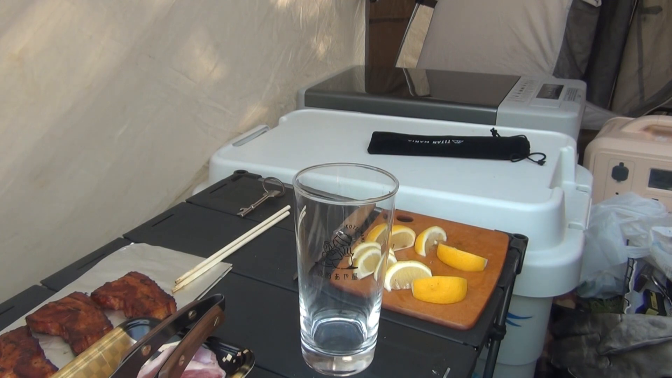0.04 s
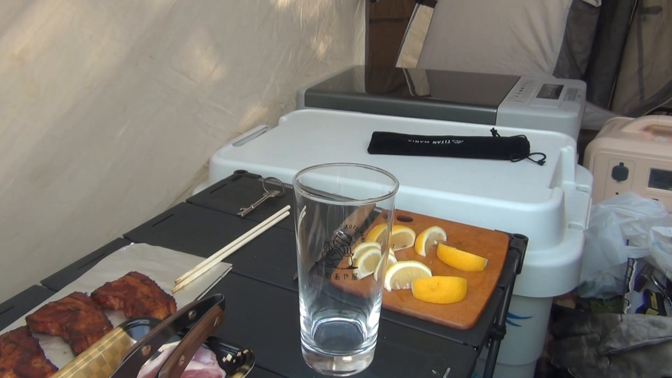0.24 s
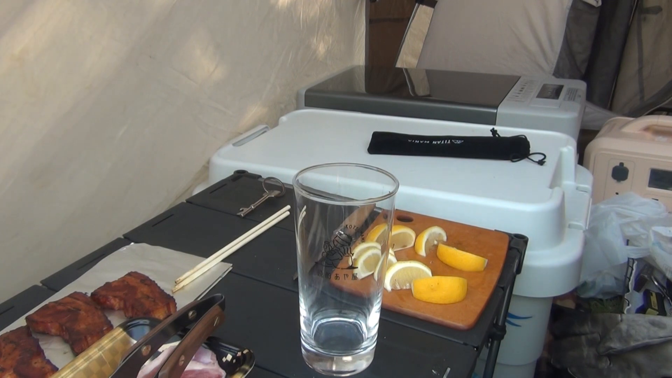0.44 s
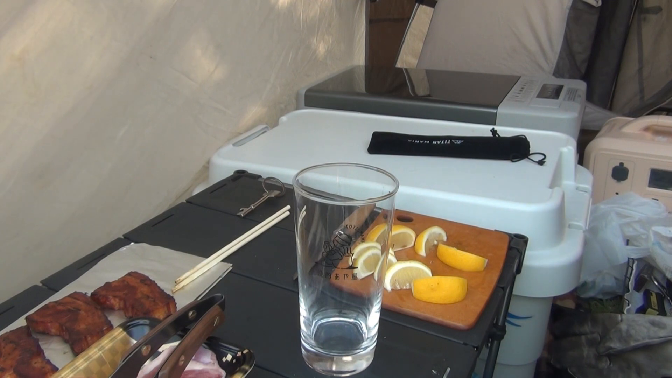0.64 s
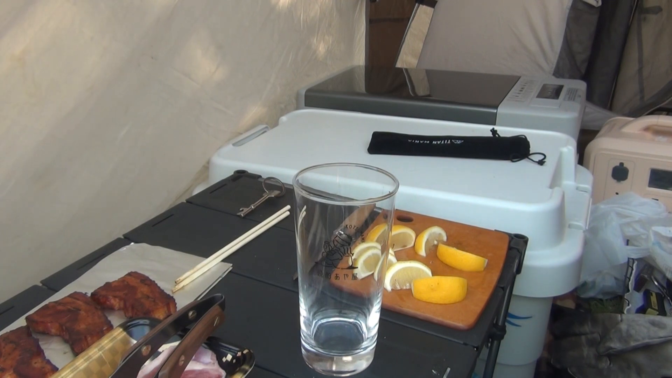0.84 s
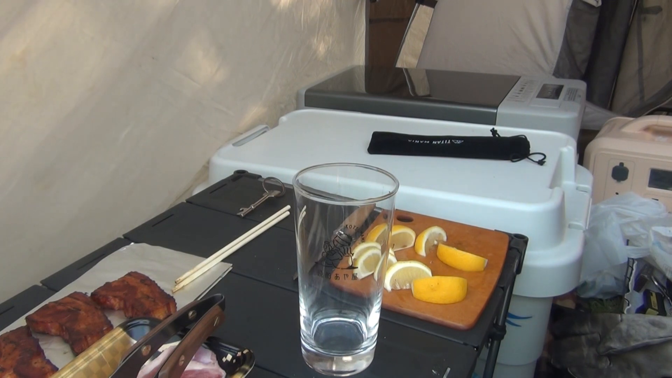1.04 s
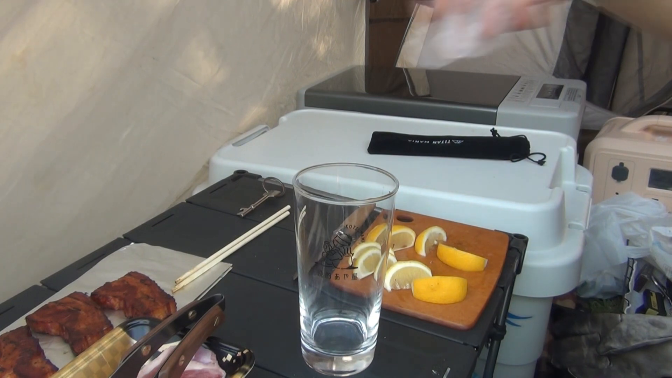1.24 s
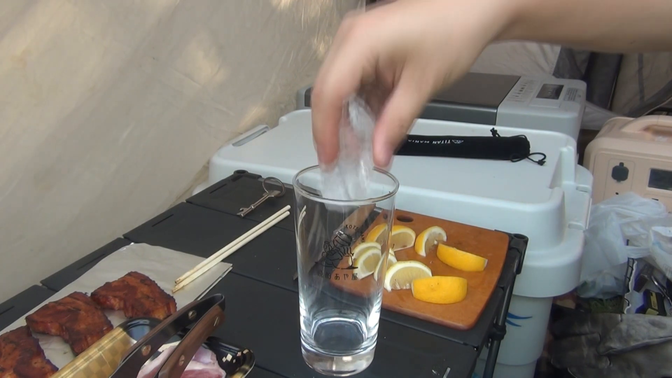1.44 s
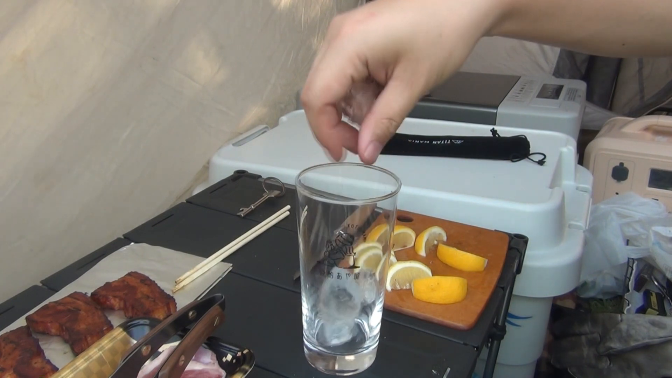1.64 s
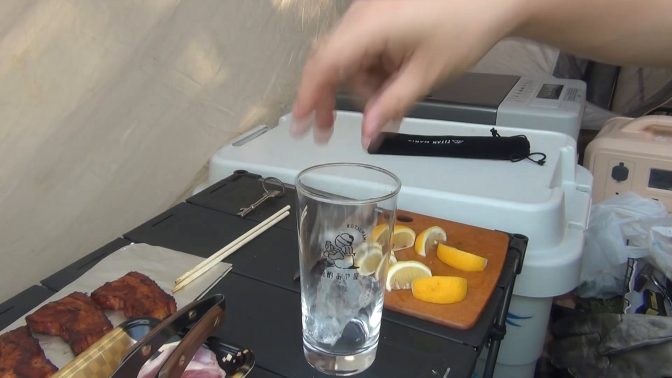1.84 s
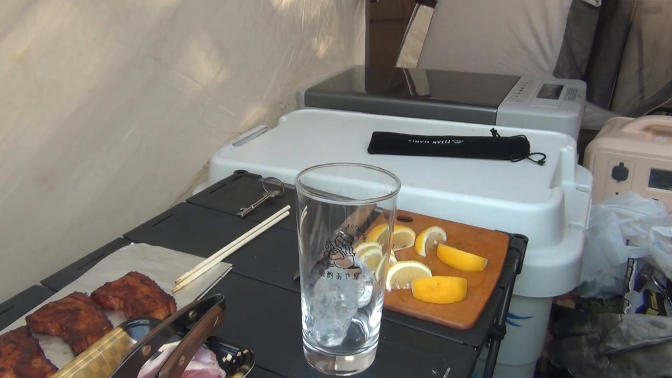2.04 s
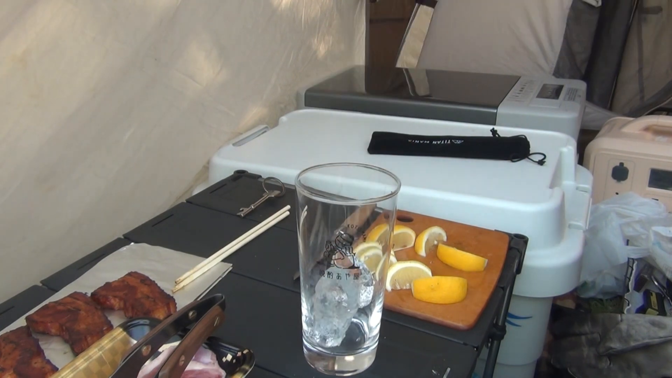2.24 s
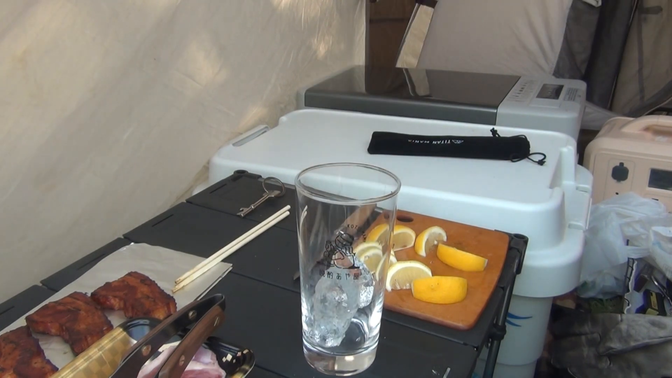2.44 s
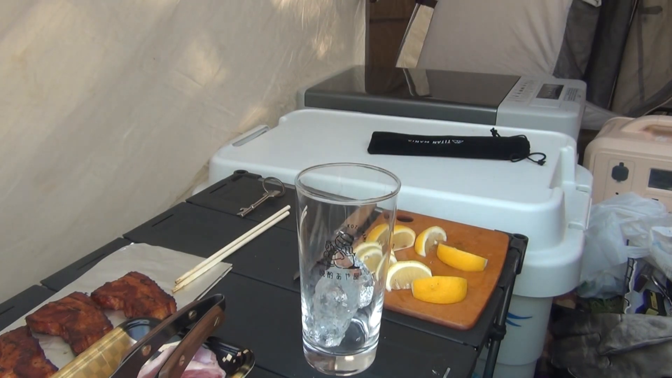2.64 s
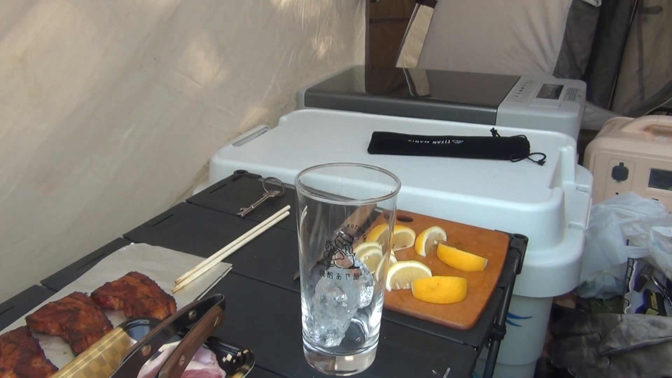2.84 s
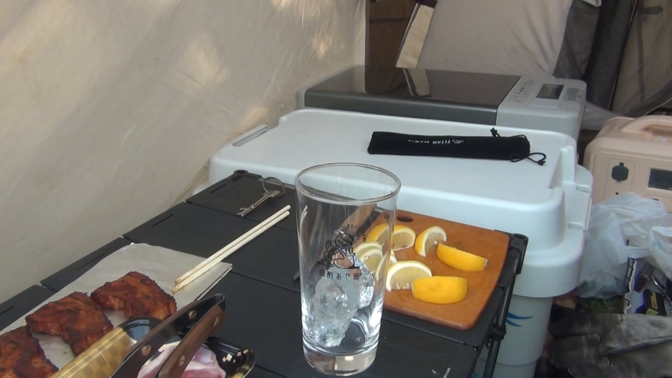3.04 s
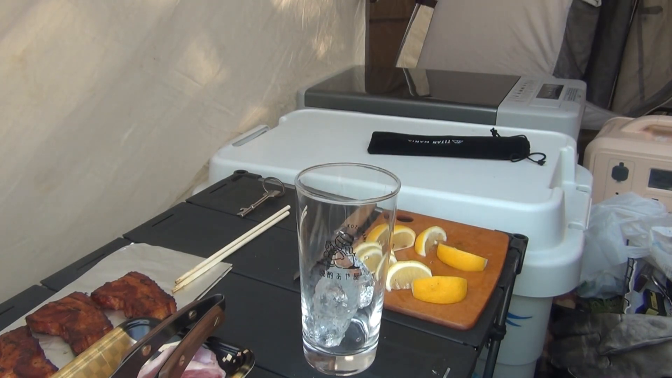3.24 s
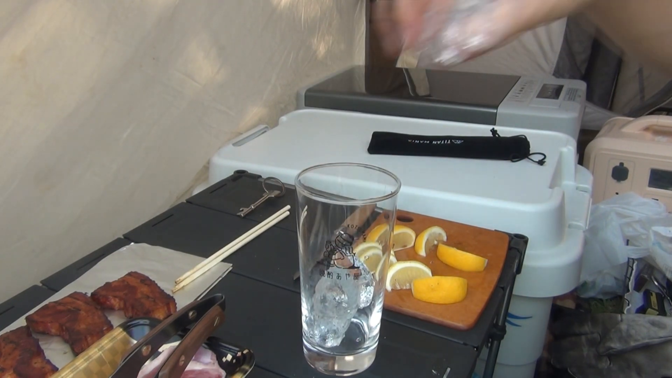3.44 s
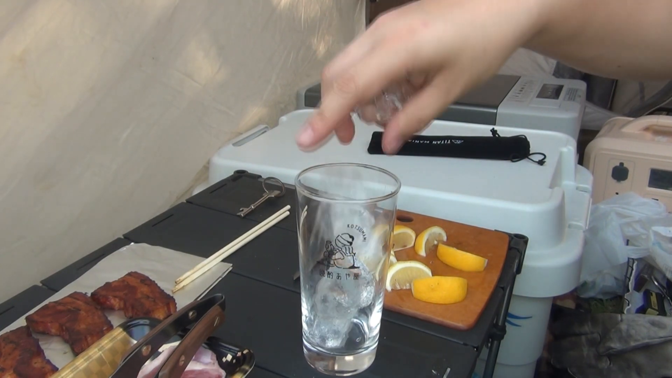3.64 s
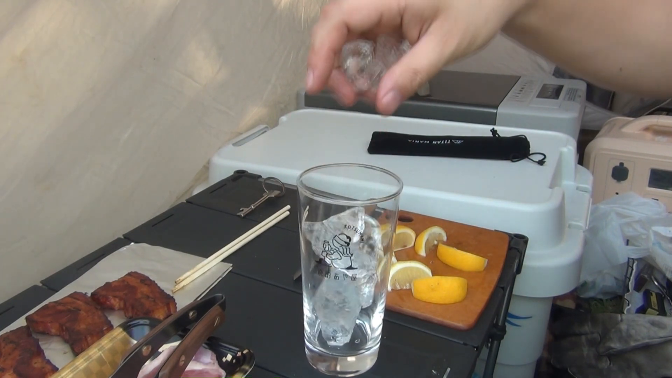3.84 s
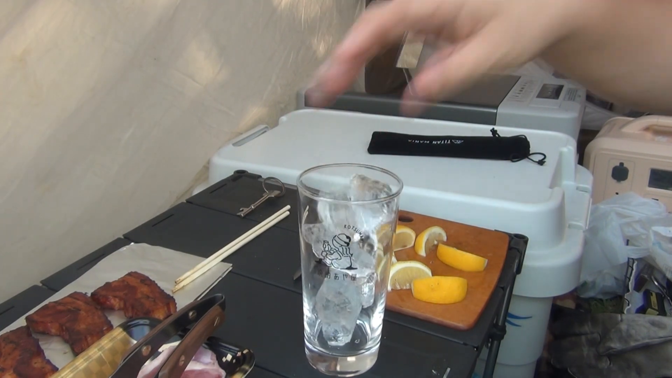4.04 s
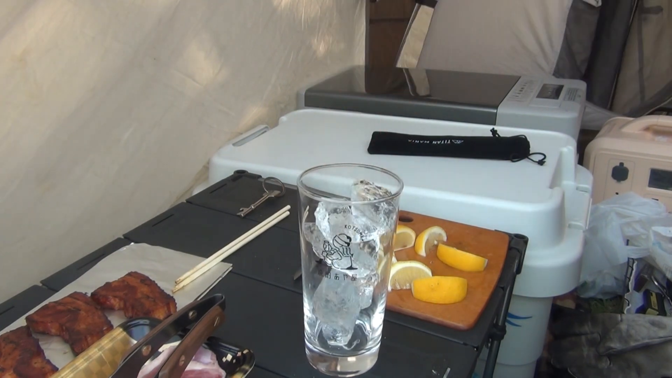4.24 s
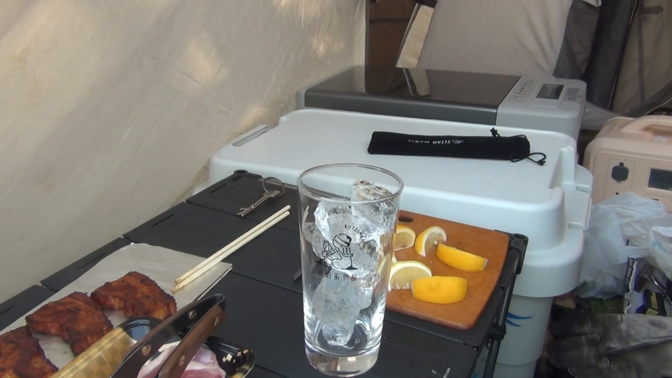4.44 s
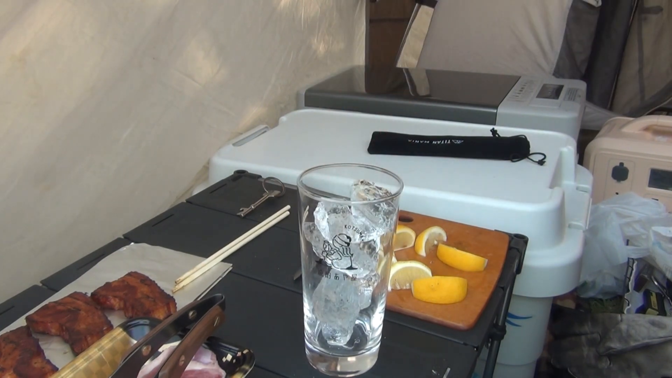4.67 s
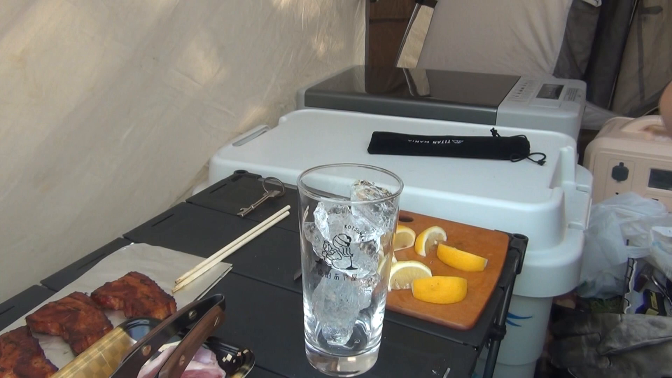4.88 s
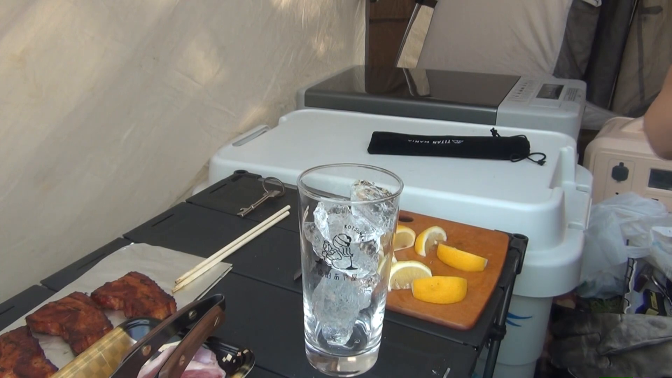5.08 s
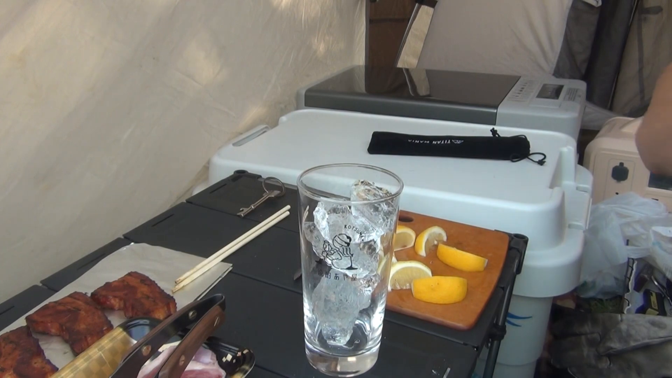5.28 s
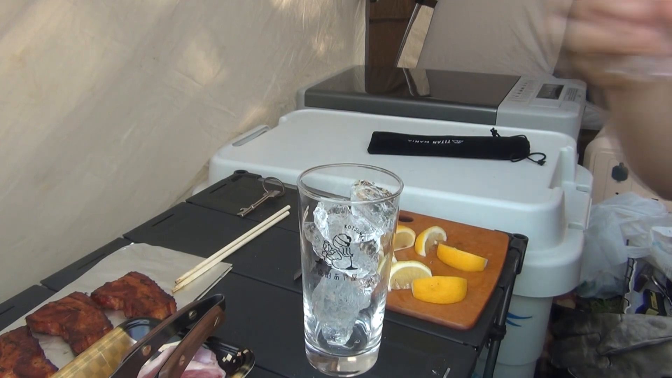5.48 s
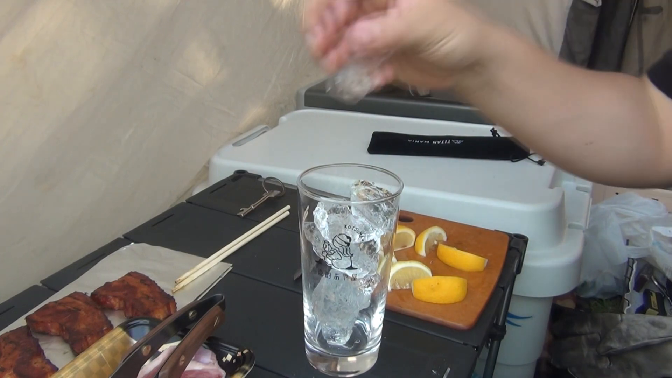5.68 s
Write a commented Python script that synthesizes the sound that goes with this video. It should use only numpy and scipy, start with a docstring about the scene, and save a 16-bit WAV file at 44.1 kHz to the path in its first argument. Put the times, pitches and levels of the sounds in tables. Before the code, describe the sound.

Close crinkling of a plastic bag, then ice dropping with bright, shortening glassy clinks and table thuds, in a quiet tent.

```python
"""In a tent, ice cubes drop into a tall glass on a camping table: modal rings, table thuds, broadband cracks.
The ring time of the glass varies with the ice in it, shortest at the end.
Around the drops a hand squeezes a plastic bag of ice to the right: resonant pops, filtered hiss, snaps.
The seat creaks in runs of slips as the arm reaches over; soft noise comes through the tent wall."""
import sys
import numpy as np
from scipy import signal
from scipy.fft import rfft, irfft, next_fast_len
from scipy.io import wavfile
from scipy.ndimage import uniform_filter1d, minimum_filter1d, map_coordinates

SR = 44100
rng = np.random.default_rng(int(sys.argv[2]) if len(sys.argv) > 2 else 0)


def transcribe(signal):
    """Save signal, clipped to [-1, 1], as a 16-bit WAV file at the path in sys.argv[1]."""
    frames = np.atleast_2d(signal).T
    limited = np.clip(frames, -1, 1)
    pcm = np.round(limited * 32767).astype(np.int16)
    wavfile.write(sys.argv[1], SR, pcm)


N = 251811


def amp(db):
    """dB to amplitude factor."""
    return 10 ** (np.asarray(db) / 20)


def unit_rms(x):
    """x scaled to rms 1."""
    return x / np.sqrt(np.mean(x ** 2) + 1e-20)


def clock():
    """Sample times in s."""
    return np.arange(N) / SR


def along(points, hz):
    """Interpolate (f/Hz, value) points on a log frequency axis."""
    f, value = np.transpose(points)
    return np.interp(np.log(hz + 1), np.log(f + 1), value)


def filtered(x, response):
    """x times a complex response of frequency."""
    m = next_fast_len(N + SR // 2)
    return irfft(rfft(x, m) * response(np.fft.rfftfreq(m, 1 / SR)), m)[..., :N]


def coloured(x, spectrum):
    """x shaped by the given spectrum, at rms 1."""
    return unit_rms(filtered(x, lambda hz: amp(along(spectrum, hz))))


def resonate(x, modes):
    """x through parallel resonances (f/Hz, width/Hz, level/dB) of alternating sign."""
    def response(f):
        total = 0
        for k, (centre, width, db) in enumerate(modes):
            damping = 1j * f * width
            total = total + (-1) ** k * amp(db) * damping / (centre * centre - f * f + damping)
        return total
    return filtered(x, response)


def add(track, s, sound):
    """Mix a sound in at time s."""
    part = track[max(round(s * SR), 0):][:len(sound)]
    part += sound[:len(part)]


def place(x, balance_db, lead_rad):
    """Stereo from left-minus-right level and left phase lead, both functions of frequency."""
    def channel(side):
        return filtered(x, lambda hz: amp(side * balance_db(hz)) * np.exp(1j * side * lead_rad(hz)))
    return np.array([channel(.5), channel(-.5)])


def grains(rate, spread_db):
    """Random impulses, rate per s on average, mostly small and a few large."""
    size = amp(spread_db * np.minimum(rng.exponential(size=N), 4))
    return (rng.random(N) < rate / SR) * size * rng.choice([-1, 1], N)


def levelled(x, span_s):
    """x with its running rms held near 1."""
    return x / np.sqrt(np.abs(uniform_filter1d(x * x, max(int(span_s * SR), 2))) + 1e-9)


def wobble(rate):
    """Random curve, straight lines between rate knots per s."""
    knots = rng.standard_normal(int(N * rate / SR) + 4)
    return map_coordinates(knots, [np.arange(N) * rate / SR], order=1)


# outdoor noise spectrum: f/Hz, level/dB
AIR_SPECTRUM = [(20, -14), (55, -5.5), (200, -3.5), (560, -10), (6000, -23.5), (16000, -26)]
AIR_DB = -49


def air():
    """Soft outdoor noise through the tent wall: a shared part plus a weaker opposed part."""
    mid, side = (coloured(rng.standard_normal(N), AIR_SPECTRUM) for _ in range(2))
    side = amp(-6.5) * filtered(side, lambda hz: hz / (hz + 150))
    return amp(AIR_DB) * np.array([mid + side, mid - side])


# decay of the tent's answer: f/Hz, t60/s
TENT_DECAY = [(200, 0.017), (2000, 0.098), (12000, 0.095)]


def tent(x):
    """Cloth and nearby boxes give a very short answer: stereo noise decaying per band."""
    hz, t, z = signal.stft(rng.standard_normal((2, SR // 5)), SR, nperseg=256)
    decay = amp(-60 * t / along(TENT_DECAY, hz)[:, None])
    tail = signal.istft(z * decay, SR, nperseg=256)[1]
    delayed = np.pad(x, (130, 0))[None]  # samples
    return signal.fftconvolve(delayed, tail / np.linalg.norm(tail[0]), axes=1)[:, :N]


# single slips of the seat: t/s, level/dB
SLIPS = [(3.557, -22), (5.5412, -25.5), (5.5934, -23.5), (5.641, -24), (5.7005, -19.5)]
# runs of slips: start/s, length/s, initial rate/(1/s), first level/dB, last level/dB
CREAKS = [(1.126, 0.41, 70, -38, -32), (3.313, 0.33, 70, -33.5, -25)]
CREAK_SLOWS = 0.25  # share of its rate that a run loses by its end
SLIP_HZ, SLIP_RISE_S = 380, 0.0012


def creak():
    """Taut seat fabric sticks and slips, ever more slowly in a run; every slip is one dull knock."""
    knocks = list(SLIPS)
    for start, length, rate, first_db, last_db in CREAKS:
        done = np.linspace(0, 1, int(length * SR))
        turns = np.cumsum(rate * (1 - CREAK_SLOWS * done)) / SR
        slip_at = done[np.flatnonzero(np.diff(np.floor(turns)))]  # one slip per whole turn
        knocks += [(start + length * u, first_db + (last_db - first_db) * u) for u in slip_at]
    slips = np.zeros(N)
    for (s, db), scatter in zip(knocks, rng.standard_normal(size=200)):
        add(slips, s, amp([db + 1.7 * scatter]))
    t = np.arange(SR // 80) / SR
    swell = t / SLIP_RISE_S * np.exp(1 - t / SLIP_RISE_S)
    knock = swell * np.sin(2 * np.pi * SLIP_HZ * t)
    cloth = amp(-6.5) * signal.fftconvolve(slips, knock)[:N]
    return cloth + amp(17) * resonate(slips, [(990, 1100, 0)])


GRIP_S, SQUEEZE_DB, RELEASE_T60_S = 0.0076, 4.5, 0.078


def squeeze(start, length):
    """Envelope of one squeeze: a quick grip, a swell as the hand presses, a release."""
    age = clock() - start
    swell_db = SQUEEZE_DB * (np.clip(age / length, 0, 1) - 1)
    release_db = -60 * np.clip((age - length) / RELEASE_T60_S, 0, 2)
    return np.clip(age / GRIP_S, 0, 1) * amp(swell_db + release_db)


# hand in the bag: from/s, to/s
REACHES = [(-.09, 1.13), (2.15, 3.28), (4.24, 5.42)]
# squeezes: start/s, length/s, crumple level/dB, hiss level/dB
GRABS = [(-0.01, 0.077, -35.5, -30.5), (0.13, 0.084, -30.5, -30.5), (0.185, 0.11, -37, -40),
         (0.348, 0.084, -32, -34.5), (0.536, 0.11, -34, -38), (0.669, 0.1, -34.5, -38.5),
         (0.869, 0.078, -35.5, -41), (0.95, 0.048, -39, -45.5), (1.03, 0.075, -39.5, -41),
         (2.194, 0.16, -35, -40), (2.368, 0.12, -33.5, -36.5), (2.518, 0.14, -35.5, -36),
         (2.697, 0.076, -27.5, -35), (2.788, 0.093, -31.5, -36.5), (3.088, 0.16, -37, -38),
         (4.277, 0.16, -44, -45.5), (4.446, 0.014, -27.5, -30), (4.46, 0.13, -37, -40),
         (4.644, 0.09, -30, -40), (4.752, 0.032, -29, -35.5), (4.806, 0.058, -33, -41.5),
         (4.91, 0.082, -35.5, -43), (5.093, 0.098, -38.5, -39), (5.223, 0.18, -44.5, -41.5)]
# spectral shaping of the folds: f/Hz, level/dB
FILM_SPECTRUM = [(100, 2), (190, -1), (400, 4), (1200, 1.5), (2000, -0.5), (3200, -1), (4300, -10.5),
                 (6000, -62), (12000, -52)]
# spectral shaping of the sliding film: f/Hz, level/dB
HISS_SPECTRUM = [(2000, 6.5), (4500, 9.5), (7000, 3.5), (10000, 6.5), (13500, 9), (16000, 0.5)]
BRUSH_CRUMPLE_DB, BRUSH_HISS_DB = -47, -53  # the arm brushes the bag between squeezes
EASE_S = 0.14  # the hand slides in
LEVEL_SPAN_S = .035


def rummage():
    """Countless small folds of plastic buckle under the hand, while film slides on film."""
    t = clock()
    inside = sum(np.clip((t - start) / EASE_S, 0, 1) * (t <= end) for start, end in REACHES)
    crumple, hiss = amp(BRUSH_CRUMPLE_DB) * inside, amp(BRUSH_HISS_DB) * inside
    for start, length, crumple_db, hiss_db in GRABS:
        press = squeeze(start, length)
        crumple = np.maximum(crumple, amp(crumple_db) * press)
        hiss = np.maximum(hiss, amp(hiss_db) * press)
    clumps = amp(4.36 * wobble(220))  # folds give way in clusters
    folds, crinkles = np.zeros(N), np.zeros(N)
    for hz in np.geomspace(230, 4600, num=12):  # fold sizes pop at different pitches
        pops = clumps * amp(3 * wobble(90)) * grains(rate=170, spread_db=3.0)
        folds += resonate(pops, [(hz, 0.26 * hz, 0)])
    for hz in np.geomspace(2500, 15000, num=10):
        crinkles += resonate(clumps * grains(rate=450, spread_db=4), [(hz, 0.2 * hz, 0)])
    slide = 0.62 * unit_rms(clumps * grains(rate=5000, spread_db=6))
    fizz = unit_rms(crinkles) + slide + 0.2 * rng.standard_normal(N)
    body = levelled(coloured(folds, FILM_SPECTRUM), LEVEL_SPAN_S)
    fizz = levelled(coloured(fizz, HISS_SPECTRUM), LEVEL_SPAN_S)
    return crumple * body + hiss * fizz


# folds that snap: t/s, level/dB, f/Hz
SNAPS = [(0.069, -17, 2930), (0.1705, -12.5, 4730), (0.191, -15.5, 1240), (0.2008, -11.5, 1430),
         (0.37, -15.5, 1560), (0.4095, -27, 704), (0.4213, -12, 2860), (0.5294, -9.5, 2500),
         (0.575, -14.5, 1700), (0.596, -19, 2740), (0.621, -12, 1690), (0.632, -13, 2920),
         (0.732, -16.5, 2530), (0.756, -17.5, 2600), (0.877, -10, 3280), (0.898, -19.5, 1850),
         (0.958, -20, 780), (0.993, -21.5, 2770), (1.106, -18.5, 1280), (2.242, -25.5, 1510),
         (2.387, -20, 486), (2.408, -15.5, 1500), (2.435, -17, 3120), (2.467, -14, 1950),
         (2.479, -14.5, 1770), (2.576, -15.5, 1090), (2.679, -11, 2900), (2.686, -16, 2400),
         (2.723, -12, 3940), (2.7465, -13, 3100), (2.766, -12, 2800), (2.92, -29.5, 1580),
         (3.025, -25.5, 3440), (3.176, -22, 2100), (4.43, -18.5, 840), (4.46, -17.5, 2060),
         (4.556, -24.5, 1190), (4.617, -13, 2650), (4.681, -14.5, 1260), (4.712, -18, 1480),
         (4.818, -19.5, 3170), (5.092, -14, 3060), (5.143, -17.5, 1640), (5.204, -15.5, 1620)]
SNAP_RING, SNAP_RING_T60_S = 0.18, 0.016  # film around the fold rings on near its pitch


def snaps():
    """A large fold flips with a pop of a few cycles, rings briefly and shakes loose a spray of small ones."""
    out, t = np.zeros(N), np.arange(SR // 25) / SR

    def noise(band_hz):
        band = signal.butter(2, band_hz, "band", fs=SR)
        return unit_rms(signal.lfilter(*band, rng.standard_normal(len(t))))

    for s, db, hz in SNAPS:
        pop = np.sin(2 * np.pi * hz * t) * np.exp(-(t * hz / 2.6) ** 2)
        ring = SNAP_RING * amp(-60 * t / SNAP_RING_T60_S) * noise([0.89 * hz, 1.34 * hz])
        edge = amp(-22.5 - 60 * t / 0.034) * noise([7500, 15000])
        spray_env = 0.69 * amp(-60 * t / 0.0043) + 0.15 * amp(-60 * t / 0.059)
        snap = pop + ring + spray_env * noise([450, 4000])
        add(out, s, amp(db) * (snap / np.abs(snap).max() + edge))
    return filtered(out, lambda hz: 1j * hz / (1j * hz + 300))  # thin film radiates little bass


# wet ice ticking by itself: t/s, level/dB
TICKS = [(1.508, -38.5), (4.2247, -37), (4.2368, -22), (4.835, -35.5), (5.091, -28.5)]
# spectrum of a tick: f/Hz, level/dB
TICK_SPECTRUM = [(300, -49), (1500, -7.5), (5000, -18), (12500, 11), (16000, -11)]


def ticks():
    """Thin, high ticks of ice that leave the glass still: noise with a two-stage decay."""
    env, t = np.zeros(N), np.arange(SR // 10) / SR
    for s, db in TICKS:
        add(env, s, amp(db) * (amp(2.5 - 60 * t / 0.018) + amp(-6 - 60 * t / 0.057)))
    return env * coloured(rng.standard_normal(N), TICK_SPECTRUM)


# ice meets glass: t/s, thud/dB, rim/dB, brightness/octaves above the lowest rim mode,
# fall away from it/(dB/octave), wall/dB, treble/dB (also the cube's own ring), crack/dB
CONTACTS = [(1.564, -20.5, -22.0, 0.51, 10, -23, -22.5, -27), (1.5794, -25, -17, 2.8, 4.5, -26, -17, -39),
            (1.596, -31, -11.5, 1.48, 8, -31.0, -25, -36), (1.618, -23, -15.5, 0.84, 7.5, -26, -25, -33),
            (1.649, -26.5, -12, 0.63, 16, -34.5, -44, -34), (1.668, -11, -25, 0.36, 7, -28, -24, -16.5),
            (1.679, -10, -14.5, 0.61, 17.0, -29, -24, -16.5),
            (1.7, -24.5, -19.5, 0.61, 11.0, -19.5, -23.0, -26),
            (1.72, -13, -16, 0.52, 16.5, -24.0, -24, -37),
            (1.744, -26, -18, 0.18, 15.0, -33.5, -35.5, -41.0),
            (1.761, -22.5, -16, 0.02, 10.5, -23.5, -21, -33),
            (1.906, -20, -24.5, 0.02, 13, -18, -27, -16.5), (1.92, -35, -21, 1.2, 10.0, -25, -14, -28.0),
            (1.934, -21, -16, 1.12, 14, -17, -16.5, -26.0), (1.963, -41, -20.0, 0.73, 11, -17.0, -18, -31),
            (1.976, -25.5, -12.5, 0.64, 14, -19, -27.5, -27), (2.016, -32, -15.0, 0.68, 20, -49, -42, -54),
            (2.1003, -23.5, -26.0, 0.57, 13.0, -32, -36.5, -36.5),
            (3.665, -33, -9.5, 2.7, 11.5, -27.5, -14, -34), (3.7033, -13, -21, 0.02, 15, -27, -18, -11.5),
            (3.714, -14, -12, 0.44, 10.0, -14, -23.0, -17.5),
            (3.737, -17, -7.5, 0.26, 10.5, -19, -21, -21.0),
            (3.768, -17, -14.5, 0.84, 8.0, -19, -22.5, -33), (3.8, -21.5, -15.5, 0.82, 24, -40, -37, -38.0),
            (3.844, -27, -39, 0.43, 0.5, -41, -38, -48), (3.869, -27, -49, 0.026, 15, -50.5, -49, -48),
            (3.928, -27, -49, 0.02, 3.0, -44.5, -44, -48), (4.037, -16, -15, 0.02, 10, -23, -15.5, -21),
            (4.045, -21, -9, 2.6, 21, -29, -22, -25), (4.052, -20.5, -10.5, 2.7, 7.5, -21.0, -16, -24),
            (4.071, -20, -13, 1.84, 5, -29, -26.0, -27), (4.0901, -28, -7, 2.9, 13, -41, -31, -20),
            (4.098, -22.5, -13.5, 2.83, 6.5, -43, -27, -25.0),
            (4.122, -22.5, -16.5, 1.07, 4, -24, -21.5, -20), (4.15, -28.5, -45, 0.02, 8, -39, -29.5, -28.5)]
CUBE_HZ, CUBE_SCATTER_OCT, CUBE_T60_S = 10890, 0.11, 0.04


def cubes():
    """Each blow makes the cube ring briefly and hoarsely, at a pitch that varies with the striking corner."""
    out, t = np.zeros(N), np.arange(SR // 8) / SR
    for s, *_, treble_db, _ in CONTACTS:
        hz = CUBE_HZ * 2 ** (CUBE_SCATTER_OCT * rng.uniform(-1.05, 1))
        band = signal.butter(2, [0.965 * hz, 1.056 * hz], "band", fs=SR)
        hoarse = unit_rms(signal.lfilter(*band, rng.standard_normal(len(t))))
        add(out, s, amp(treble_db - 60 * t / CUBE_T60_S) * hoarse)
    return out


# rim bending modes, lowest first: f/Hz, relative level/dB, free t60/s
RIM = [(1460, 0, .42), (2830, -3, .64), (5106, -10, .35), (8106, -4, .17)]
# wall and base modes: f/Hz, relative level/dB, free t60/s
WALL = [(5380, -8, .18), (5523, -2, .27), (5696, -3.5, .28), (7471, -6, .2)]
# highest modes, woken by a sharp corner of ice: f/Hz, relative level/dB, free t60/s
TREBLE = [(9929, -6, .23), (10357, -8, .16), (10912, -9, .14), (11159, -3, .2), (11851, -15, .1),
          (13827, -13, .15), (14190, -13, .12)]
# damping by ice: t/s, share of free ring time
FILL = [(1.8, 1.0), (2.0, 0.46), (3.7, 0.61), (4.05, 0.3)]
# table under the glass: f/Hz, width/Hz, level/dB
TABLE_MODES = [(202, 54, -1.5), (270, 80, -1.5), (619, 124, -3.5), (923, 117, -2.5), (1476, 430, -1.5),
               (1910, 2400, -14)]
# crack spectrum: f/Hz, level/dB
CRACK_SPECTRUM = [(200, -17), (900, -1.5), (3400, 1.5), (6300, -5.5), (11000, -6.5), (15500, -17)]
# glass bobbing on the table once ice reaches its bottom: t/s, f/Hz, relative level/dB
BOB = [(1.62, 695, -13), (1.665, 693, 1), (1.73, 693, -5), (2.1, 715, 5), (3.7, 670, -3)]
BOB_DB, BOB_FREE_T60_S = -9, 0.19  # level re thud
ICE_MUTE = 1.42  # how strongly the ice also mutes the lowest rim mode
WALL_FLUTTER = .45


def glass():
    """Each contact stops the old ring and starts a new mix of modes, with a table thud, a bob and a crack."""
    s, thud_db, ring_db, bright, fall_db, wall_db, treble_db, crack_db = np.transpose(CONTACTS)
    t = clock()
    last = np.maximum(np.searchsorted(s, t, side="right") - 1, 0)  # latest contact
    age, begun = np.maximum(t - s[last], 0), t >= s[0]
    share = np.interp(s, *np.transpose(FILL))
    free = share[last]

    def mode(hz, level_db, free_t60, kick_rad, build_s, flutter):
        """One decaying mode; each contact shifts its phase at random."""
        phase = np.exp(1j * np.cumsum(kick_rad * rng.standard_normal(len(s))))
        decay = amp(np.maximum(-60 * age / (free_t60 * free), -150))
        swing = begun * (amp(level_db) * phase)[last] * decay
        keep = np.exp(-1 / (build_s * SR))
        swing = signal.lfilter([1 - keep], [1, -keep], swing)
        # the rocking ice loads the glass unevenly
        swing *= 1 + flutter / free * (wobble(170) + 1j * wobble(170))
        carrier = np.exp(2j * np.pi * np.cumsum(hz * np.ones(N)) / SR)
        return np.sqrt(2) * np.real(swing * carrier)

    rim, wall = np.zeros(N), np.zeros(N)
    for k, (hz, db, t60) in enumerate(RIM):
        level_db = db + ring_db - fall_db * np.abs(np.log2(hz / RIM[0][0]) - bright)
        if k == 0:
            level_db = level_db + ICE_MUTE * 20 * np.log10(share)
        rim += mode(hz, level_db, t60, kick_rad=0.64, build_s=0.73 / hz, flutter=0.11)
    for modes, group_db in ((WALL, wall_db), (TREBLE, treble_db)):
        for hz, db, t60 in modes:
            level_db = group_db + db + rng.normal(0, 3.6, len(s))
            wall += mode(hz, level_db, t60, kick_rad=1.0, build_s=0.00026, flutter=WALL_FLUTTER)

    def chatter():
        """The cube chatters for a moment on every contact."""
        return levelled(grains(rate=3500, spread_db=1.5), 0.0062)

    # the base passes the blow to the table, whose small top radiates little bass
    push = begun * amp(thud_db[last] - 60 * age / 0.065) * chatter()
    thud = amp(13) * filtered(resonate(push, TABLE_MODES), lambda hz: 1j * hz / (1j * hz + 110))
    bob_s, bob_hz, bob_db = np.transpose(BOB)
    bob_level_db = thud_db + BOB_DB + np.interp(s, bob_s, bob_db)
    bob = mode(np.interp(t, bob_s, bob_hz), bob_level_db, BOB_FREE_T60_S,
               kick_rad=0.75, build_s=0.0013, flutter=0.3)
    crack_env = amp(5.5 - 60 * age / 0.0096) + amp(-2.0 - 60 * age / 0.1)
    crack = begun * amp(crack_db[last]) * crack_env * coloured(chatter(), CRACK_SPECTRUM)
    return amp(4.0) * rim + amp(-3.5) * wall + thud + bob + crack


# left phase lead of the glass: f/Hz, lead/rad
GLASS_LEAD = [(60, 0.1), (520, -0.8), (7000, -0.26), (9400, 0.31)]
# bag and seat balance: f/Hz, left minus right level/dB
BAG_SIDE = [(200, -0.5), (700, -3), (2400, -6), (4400, -5), (8000, 3), (15000, 2.5)]
CLINK_ROOM_DB, HANDLING_ROOM_DB = -21, -12


def scene():
    """Glass straight ahead, bag and seat to the right, the tent's answer and the air around."""
    clinks = glass() + cubes() + ticks()
    handling = rummage() + snaps() + creak()

    def right_lead_rad(hz):
        """Sound from the right is 45 us late at left; the treble arrives in step."""
        return -2 * np.pi * hz * 45e-6 / (1 + (hz / 6000) ** 6)

    ahead = place(clinks, np.zeros_like, lambda hz: along(GLASS_LEAD, hz))
    right = place(handling, lambda hz: along(BAG_SIDE, hz), right_lead_rad)
    walls = amp(CLINK_ROOM_DB) * tent(clinks) + amp(HANDLING_ROOM_DB) * tent(handling)
    return ahead + right + walls + air()


LIMIT_DB, TOP_HZ = -5.0, 16000


def record(dry):
    """A fast limiter holds the loudest peaks down; then a low-pass cuts all above TOP_HZ."""
    needed = np.minimum(1, amp(LIMIT_DB) / (np.abs(dry).max(axis=0) + 1e-9))
    gain = uniform_filter1d(minimum_filter1d(needed, size=130), size=90)
    return filtered(dry * gain, lambda hz: hz < TOP_HZ)


dry = scene()
out = record(dry)
transcribe(out)
```